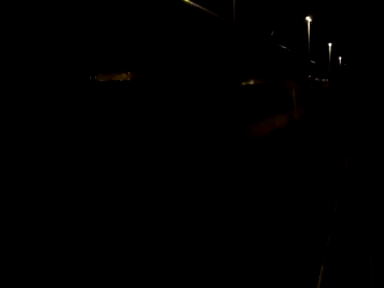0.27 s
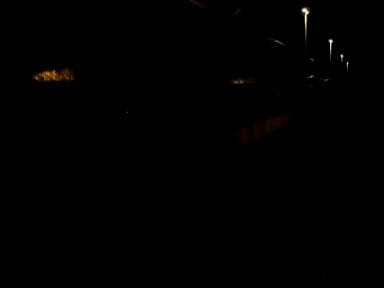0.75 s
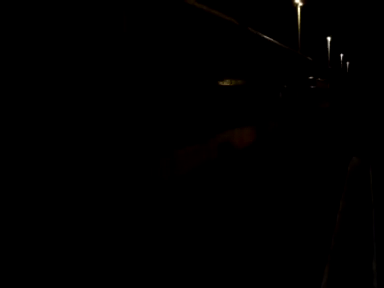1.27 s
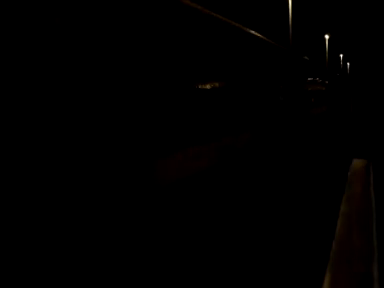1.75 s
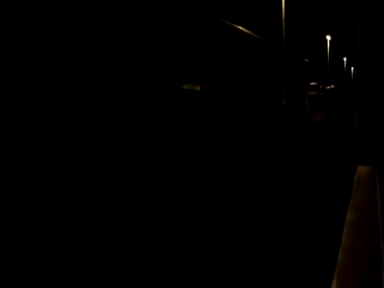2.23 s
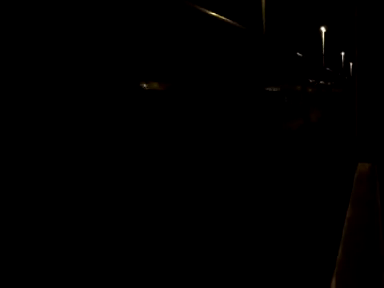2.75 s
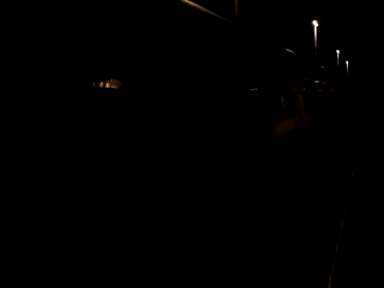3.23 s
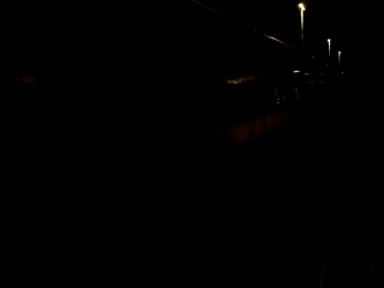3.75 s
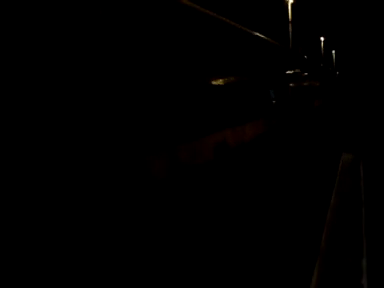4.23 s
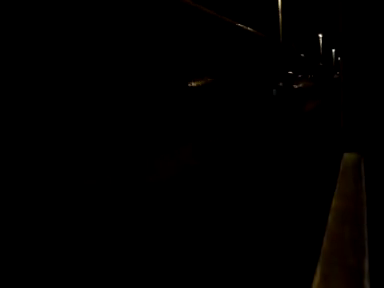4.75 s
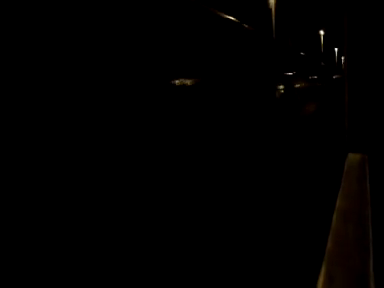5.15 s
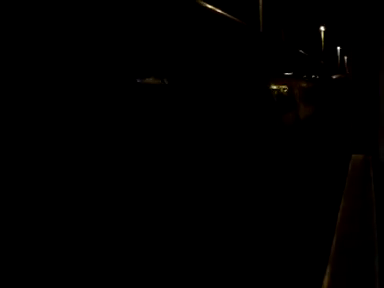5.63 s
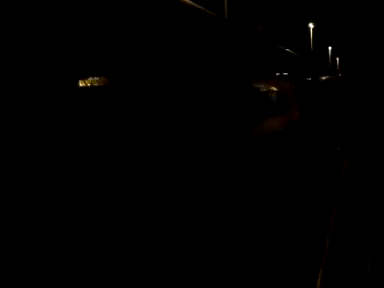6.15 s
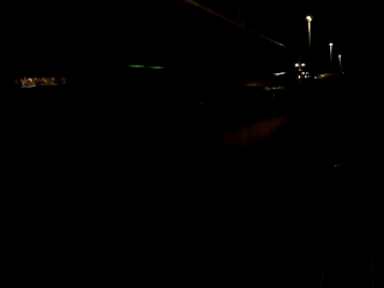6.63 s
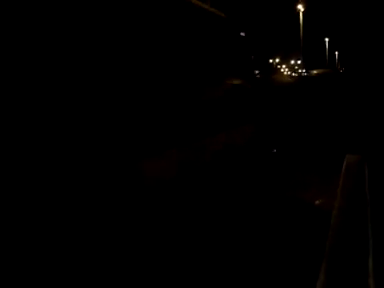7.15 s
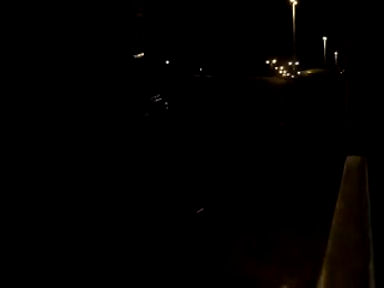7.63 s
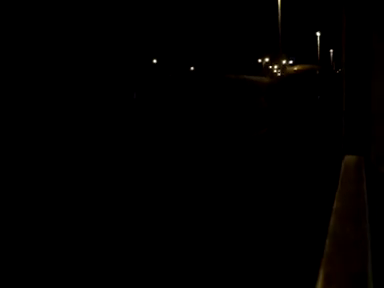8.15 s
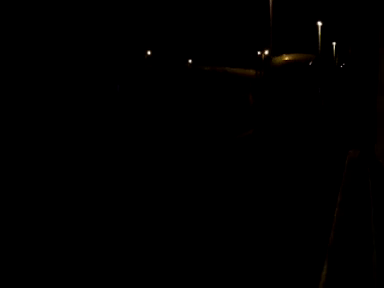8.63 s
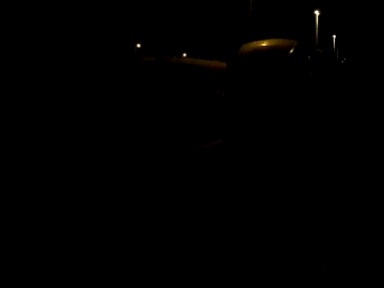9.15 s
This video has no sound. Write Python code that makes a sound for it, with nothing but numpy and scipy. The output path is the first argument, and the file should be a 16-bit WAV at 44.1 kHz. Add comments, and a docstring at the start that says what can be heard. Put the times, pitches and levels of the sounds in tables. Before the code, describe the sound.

Close passing train: low coach rumble and rough wheel roar beneath irregular heavy wind buffets, sharp snaps and a few thin metallic squeals.

```python
"""Heard first are wind thuds and coach rumble: at night a passenger train rolls past a platform,
close to a small microphone. Noise through resonances makes the rail and wheel roar; shaped noise adds hiss
and rumble. A few wheels squeal as wavering tones with harmonics. The slipstream is patchy low noise with
short buffets and sharp snaps; after the hardest buffets the train is heard much lower and creeps back."""
import sys
import numpy as np
from scipy import signal
from scipy.io import wavfile

SR = 44100
rng = np.random.default_rng(int(sys.argv[2]) if len(sys.argv) > 2 else 0)


def store_pcm(level_fs):
    """Save levels as 16-bit WAV."""
    pcm = np.round(np.clip(level_fs, -1, 1) * 32767).astype(np.int16)
    wavfile.write(sys.argv[1], SR, np.atleast_2d(pcm).T)


N = 413658

# steady slipstream on the microphone: (time [s], gain [dB])
SLIPSTREAM_LEVEL = [(0.0, -16), (0.45, -27), (0.75, -21), (0.94, -35), (1.15, -20), (1.75, -21),
                    (2.85, -31), (3.34, -15), (3.9, -32), (4.7, -25.5), (5.3, -38), (5.56, -24.5),
                    (6.35, -31.5), (6.7, -22.5), (7.35, -25.5), (7.52, -16), (7.85, -29), (8.1, -21.5),
                    (9.1, -24.5), (9.38, -10)]
# relative spectrum of the slipstream: (frequency [Hz], density [dB per Hz])
SLIPSTREAM_SPECTRUM = [(8.8, -36), (15, 2.5), (44, 12.5), (145, -2.5), (205, -4), (250, -22), (320, -42.5),
                       (550, -120)]
# eddies hitting the microphone: (start [s], thud peak [dB], flutter rms [dB], length [s])
BUFFETS = [(0.097, -8, -31, 0.067), (0.166, -7.5, -26, 0.053), (0.371, -2, -36, 0.052),
           (0.588, -2.5, -27, 0.038), (0.618, -13, -42, 0.091), (0.803, -9.5, -38, 0.083),
           (1.333, -5, -26, 0.021), (1.348, -3.5, -26, 0.041), (1.597, -17, -30, 0.036),
           (1.724, -10, -18.5, 0.044), (1.763, -11, -26.5, 0.035), (2.099, -5, -28, 0.049),
           (2.216, -3.5, -23, 0.033), (2.312, -12, -40, 0.032), (2.434, -10, -42, 0.062),
           (2.894, -11, -31, 0.042), (2.927, 4.5, -32, 0.051), (3.284, -33, -23.5, 0.058),
           (3.353, -6, -23, 0.031), (3.507, -5.5, -20, 0.045), (3.752, -4, -27, 0.057),
           (4.723, -7.5, -41, 0.068), (4.789, -6.5, -34, 0.028), (5.193, -6.5, -34, 0.053),
           (5.536, -19, -20.5, 0.054), (5.996, -5, -44, 0.057), (6.28, -14, -23, 0.043),
           (6.323, -8.5, -33, 0.082), (6.548, -10, -13, 0.014), (6.572, -6.5, -34, 0.035),
           (6.868, -11, -19.5, 0.035), (6.958, -8, -16, 0.03), (7.012, -10, -23, 0.033),
           (7.162, -4, -20, 0.047), (7.346, -5, -30, 0.041), (7.421, -21, -24, 0.06),
           (7.505, -11.5, -44, 0.044), (7.616, -10, -26, 0.08), (7.907, -5, -22, 0.054),
           (7.968, -10, -43, 0.087), (8.217, -1, -21, 0.053), (8.415, -13, -32.5, 0.076),
           (8.519, -15.5, -34, 0.034), (8.581, -9.5, -34, 0.068), (8.784, -10, -42, 0.087),
           (8.882, -5, -33, 0.038), (9.187, -5, -41, 0.067), (9.245, -3.5, -26, 0.038),
           (9.334, -25, -26.5, 0.064)]
# sharp pressure steps inside the eddies: (start [s], peak of the dull body [dB])
SNAPS = [(0.181, -22), (0.399, -12), (0.602, -21), (1.361, -9.5), (1.375, -13), (1.742, -20), (2.232, -16),
         (2.323, -19.5), (2.952, -17), (2.965, -11), (3.287, -15.5), (3.365, -15), (3.521, -14),
         (4.668, -11.5), (6.289, -9), (6.341, -13), (6.552, -12), (6.575, -16), (6.965, -17), (7.026, -12),
         (7.183, -16), (7.367, -10.5), (7.447, -17), (7.938, -18), (7.956, -14.5), (8.098, -18.5),
         (8.137, -22), (8.230, -9), (8.238, -3.5), (8.256, -21), (8.305, -33), (8.435, -34), (8.455, -29),
         (8.542, -29), (8.603, -22), (8.629, -27), (8.896, -28)]
# drops after the hardest buffets: (start [s], depth before the recovery curve [dB])
DIPS = [(1.37, 8), (2.135, 6), (2.959, 17), (3.78, 5.5), (6.35, 5), (6.97, 5), (7.19, 3.5), (8.25, 21)]
# wheel squeals: (start [s], rise [s], fall [s], start pitch [Hz], end pitch [Hz],
# level before doubling and throb [dB], 2nd harmonic against the fundamental [dB])
SQUEALS = [(.19, .01, .06, 7750, 7700, -47, -40), (.46, .03, .04, 7700, 7700, -53, -40),
           (2.67, .01, 0.18, 10250, 9900, -53, -40), (4.154, 0.023, 0.036, 6760, 6750, -37, -40),
           (5.48, 0.032, 0.12, 794, 789, -33.5, -40), (5.62, .05, .04, 7350, 7400, -55, -35),
           (5.742, .012, .11, 2612, 2630, -36, -17), (5.79, 0.088, 0.037, 2620, 2606, -33.5, -10),
           (5.855, 0.019, 0.14, 2845, 2760, -34, -11), (5.94, 0.065, 0.088, 2860, 2950, -40.5, -9),
           (6.055, .01, .025, 7000, 7080, -47, -40), (6.065, .01, 0.033, 9350, 9300, -46, -40),
           (6.112, 0.011, 0.15, 5460, 5580, -32, -20), (6.115, .01, 0.022, 9700, 9700, -47, -40),
           (6.128, 0.012, .07, 3430, 3380, -42, -5), (6.135, 0.012, .035, 9050, 9050, -43, -40),
           (7.82, .01, 0.043, 7800, 7800, -52, -40), (8.688, .03, 0.088, 2380, 2340, -48, -16)]
# underlying rolling noise: (time [s], roar gain [dB], hiss above the roar gain [dB], rumble gain [dB])
ROLLING_LEVEL = [(0.0, -43.5, -4, -30.5), (0.4, -40.5, -3.5, -24.5), (0.75, -41.5, -5, -28.5),
                 (1.3, -39.5, -5.5, -27), (2.0, -40.5, -3.5, -26), (2.5, -41, -3.5, -22.5),
                 (2.9, -39.5, -2.5, -17.5), (3.6, -40.5, -6.5, -19.5), (4.2, -40.5, -3.5, -20),
                 (4.6, -39.5, -5.5, -17), (5.55, -40.5, -4.5, -18), (5.8, -43.5, -4, -20.5),
                 (6.25, -41.5, -5.5, -18.5), (6.75, -42, -6.5, -20.5), (7.4, -43.5, 0.5, -20),
                 (8.2, -44.5, -8, -21), (8.8, -44.5, -5.5, -23.5), (9.38, -45, -11, -20.5)]
# a wheelset passes close and the rolling noise changes:
# (centre [s], bell width [s], roar change [dB], hiss-above-roar change [dB], rumble change [dB])
WHEELSET_SWELLS = [(0.2, 0.027, 2.5, 1, 1.5), (2.74, 0.096, -0.5, 0, 0.5), (3.46, 0.067, 2.5, 1.5, 2),
                   (3.71, 0.022, 1, 5, 3.5), (4.7, .03, 3, 8.5, 2), (6.1, .04, 0, 3.5, -2),
                   (6.31, 0.018, 2, 0, 7.5), (6.56, .03, 1.5, 7, 5), (6.91, 0.088, 5, 0, 4.5),
                   (7.14, 0.02, 3.5, 3, 3.5), (7.55, 0.097, -0.5, -7, 1.5), (7.86, 0.057, 1.5, 1, -2.5)]
# relative spectra of coach rumble, running-gear hiss and rail roar: (frequency [Hz], density [dB per Hz])
RUMBLE_SPECTRUM = [(65, -17), (110, -1.5), (177, -3.5), (221, 5.5), (300, -7.5), (343, -1), (546, -11),
                   (629, -22), (800, -25), (1040, -58.5), (1760, -120)]
HISS_SPECTRUM = [(2530, -26.5), (4300, 6), (4550, -10), (6340, 7.5), (8020, -4), (9890, 8.5),
                 (10500, -16.5), (13600, -48), (22000, -120)]
ROAR_SPECTRUM = [(380, -41.5), (650, -2), (1120, 0), (1370, -9), (1580, -7), (1910, -10.5), (2190, -4.5),
                 (3380, -8), (4800, -18), (6240, -40.5), (10600, -120)]
# coach and sleeper resonances: (frequency [Hz], width [Hz], level against the broad rumble [dB])
COACH_MODES = [(213.7, 17, -16), (330.4, 80, -9), (542, 39, -14.5)]
# wheel and rail resonances excited by roughness: (frequency [Hz], width [Hz], level against rms 1 [dB])
WHEEL_MODES = [(790, 90, -6), (1516, 37, -4.5), (1620, 125, 0.5), (2187, 120, -3.5), (3370, 110, -9),
               (5030, 61, -26), (7680, 90, -27), (10050, 86, -33), (4050, 350, -14), (8265, 31, -25)]

DROP_S, RECOVERY_S = 0.01, 0.56   # time constants of a dip
RUMBLE_DIP_SHARE, WIND_DIP_SHARE = 0.85, 0.27   # share of the dip in dB
EDGE_FADE_POWER = 2.5   # a snap's edge dies this many times faster than its body
EDGE_DB = -13   # peak of the bright edge against the body
THIRD_BELOW_SECOND_DB = -5   # third squeal harmonic against the second
FALL_CURVE = 1.1   # exponent of a squeal's fall
KNEE = 0.29   # share of full scale
CUTOFF_HZ = 10950   # stop-band edge of the final steep low-pass, above which nothing is heard


def from_db(db):
    """Decibels to gain."""
    return 10 ** (np.asarray(db) / 20)


def rms_one(x):
    """Scale to rms 1."""
    return x / np.sqrt(np.mean(x ** 2) + 1e-20)


def in_time(rows):
    """Interpolate the columns of a timed table, one value a sample."""
    s, *columns = np.transpose(rows)
    return [np.interp(np.arange(N) / SR, s, column) for column in columns]


def drift(corner_hz):
    """Slow chance of rms 1: noise at every 40th sample through two equal one-pole low-passes."""
    r = np.exp(-2 * np.pi * corner_hz * 40 / SR)
    white = rng.standard_normal(N // 40 + 2002)
    slow = signal.lfilter([1], [1, -2 * r, r * r], white)[2000:]   # drop the filter's settling
    return np.interp(np.arange(N) / 40, np.arange(len(slow)), rms_one(slow))


def band(x, low_hz, high_hz):
    """Butterworth band-pass."""
    return signal.sosfilt(signal.butter(2, [low_hz, high_hz], "band", fs=SR, output="sos"), x)


def banded_noise(spectrum, patchy_db, rate):
    """Third-octave noise bands, each with its level and a partly shared flicker; rms 1."""
    hz, level_db = np.transpose(spectrum)
    octaves = np.arange(0, np.log2(hz[-1] / hz[0]) + 1 / 3, 1 / 3)
    edges = hz[0] * 2 ** octaves
    edges = edges[edges < .3 * SR]
    white = rng.standard_normal((2, N))   # neighbouring bands use different noise
    together = drift(rate)
    out = 0
    for k, (low, high) in enumerate(zip(edges, edges[1:])):
        centre_db = np.interp(np.log(low * high) / 2, np.log(hz), level_db)
        flicker_db = patchy_db * (.8 * together + drift(rate))
        out = out + from_db(centre_db + flicker_db) * band(white[k % 2], low, high)
    return rms_one(out)


def resonant_noise(modes, patchy_db):
    """Noise through a two-pole resonance per mode, each coming and going on its own."""
    out = 0
    for hz, width_hz, level_db in modes:
        r = np.exp(-np.pi * width_hz / SR)
        poles = [1, -2 * r * np.cos(2 * np.pi * hz / SR), r * r]
        ringing = signal.lfilter([1, 0, -1], poles, rng.standard_normal(N))
        out = out + from_db(level_db + patchy_db * drift(1.7)) * rms_one(ringing)
    return out


def dip_db():
    """Each dip falls within tens of milliseconds and recovers exponentially."""
    start, depth_db = np.transpose(DIPS)[:, :, None]
    since = np.maximum(np.arange(N) / SR - start, 0)
    drop = 1 - np.exp(-since / DROP_S)
    return -np.sum(depth_db * drop * np.exp(-since / RECOVERY_S), axis=0)


def slipstream(dip):
    """Turbulent air moving past the microphone makes patchy low noise."""
    (wind_db,) = in_time(SLIPSTREAM_LEVEL)
    wind = banded_noise(SLIPSTREAM_SPECTRUM, patchy_db=4.0, rate=23.0)
    return from_db(wind_db + WIND_DIP_SHARE * dip) * wind


def buffets():
    """Each eddy that hits the microphone port gives a low thud and a faster flutter."""
    white = rng.standard_normal((2, N))
    thud = band(white[0], 27, 131.0)
    flutter = band(band(white[1], 150, 615), 150, 615)   # twice, for steeper sides
    out = np.zeros(N)
    for start, thud_db, flutter_db, length in BUFFETS:
        end = start + max(length, .01)
        at = slice(round(start * SR), min(round(end * SR), N))
        hump = np.sin(np.linspace(0, np.pi, at.stop - at.start)) ** 1.12
        push = hump * thud[at]
        out[at] += from_db(thud_db) * push / np.abs(push).max()
        out[at] += from_db(flutter_db) * rms_one(hump * flutter[at])
    return out


def snaps():
    """A pressure step is a burst of jolts dying within milliseconds, dull but with a bright edge."""
    fade = np.exp(-np.arange(round(.03 * SR)) / (0.0052 * SR))
    out = np.zeros(N + len(fade))
    noise = rng.standard_normal((len(SNAPS), len(fade)))
    for (start, peak_db), jolts in zip(SNAPS, noise):
        jolts = jolts + 4.0 * (fade == 1)   # extra push on the first jolt
        jolts = band(jolts, 110, 3500)   # the port dulls the top of each step
        body = band(jolts * fade, 340, 990)
        edge = band(jolts * fade ** EDGE_FADE_POWER, 900, 2800)
        snap = body / np.abs(body).max() + from_db(EDGE_DB) * edge / np.abs(edge).max()
        out[round(start * SR):][:len(fade)] += from_db(peak_db) * snap
    return out[:N]


def squeals():
    """Stick-slip of a flange: a wavering tone with harmonics that swells, throbs and dies."""
    out = np.zeros(N)
    waver = drift(150.0)
    throb = from_db(3.5 * drift(80.0))
    for start, rise, fall, start_hz, end_hz, level_db, second_db in SQUEALS:
        t = np.arange(round((rise + fall) * SR)) / SR
        at = slice(round(start * SR), round(start * SR) + len(t))
        glide_hz = start_hz + (end_hz - start_hz) * t / t[-1]
        phase = 2 * np.pi * np.cumsum(glide_hz * (1 + .005 * waver[at])) / SR
        overtones = np.sin(2 * phase) + from_db(THIRD_BELOW_SECOND_DB) * np.sin(3 * phase)
        tone = np.sin(phase) + from_db(second_db) * overtones
        dying = np.clip(1 - (t - rise) / fall, 0, 1) ** FALL_CURVE
        shape = np.minimum(t / rise, 1) * dying
        out[at] += from_db(level_db) * 2 * shape * throb[at] * tone
    return out


def swell_db():
    """Bell-shaped changes of roar, hiss and rumble as a wheelset passes close."""
    rows = np.array(WHEELSET_SWELLS)
    centre, width = rows[:, :1], rows[:, 1:2]
    bells = np.exp(-.5 * ((np.arange(N) / SR - centre) / width) ** 2)
    return rows[:, 2:].T @ bells


def coach_rumble():
    """Broad low noise with the resonances of coaches and sleepers."""
    broad = banded_noise(RUMBLE_SPECTRUM, patchy_db=1.0, rate=14.0)
    return broad + resonant_noise(COACH_MODES, patchy_db=1.2)


def running_gear_hiss():
    """Flickering treble noise of the running gear."""
    return banded_noise(HISS_SPECTRUM, patchy_db=1.5, rate=13.0)


def rail_and_wheel_roar():
    """Roughness noise, broad and through the resonances of rail and wheel."""
    ringing = resonant_noise(WHEEL_MODES, patchy_db=1.5)
    broad = banded_noise(ROAR_SPECTRUM, patchy_db=.8, rate=12.0)
    return from_db(5.0) * broad + ringing


def train(dip):
    """Rolling contact gives roar and hiss, the coaches rumble; dips lower all three."""
    roar_db, hiss_db, rumble_db = in_time(ROLLING_LEVEL) + swell_db()
    rolling = rail_and_wheel_roar() + from_db(hiss_db) * running_gear_hiss()
    rumble = from_db(rumble_db + RUMBLE_DIP_SHARE * dip) * coach_rumble()
    return from_db(roar_db + dip) * rolling + rumble


def scene():
    """Wind, squeals and train add up at one microphone close to the track."""
    dip = dip_db()
    wind = slipstream(dip) + buffets() + snaps()
    return (wind + squeals() + train(dip))[None]


def record(dry):
    """Peaks are rounded above the knee, the input overloads at full scale; a steep low-pass cuts the top."""
    over = np.maximum(np.abs(dry) - KNEE, 0)
    rounded = np.clip(dry - np.sign(dry) * over * .35, -1, 1)
    low_pass = signal.cheby2(24, 70, CUTOFF_HZ, fs=SR, output="sos")
    return signal.sosfilt(low_pass, rounded)


dry = scene()
out = record(dry)
store_pcm(out)
```